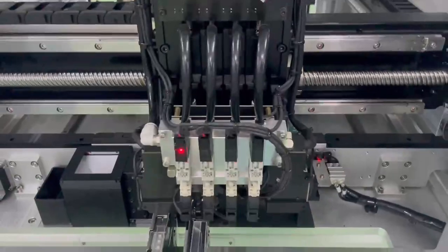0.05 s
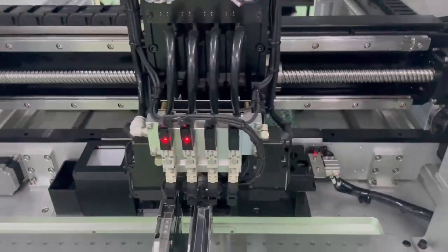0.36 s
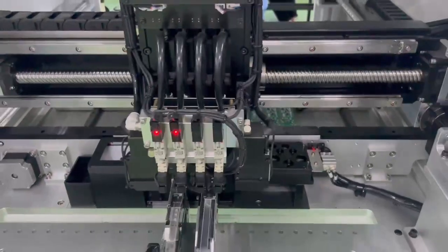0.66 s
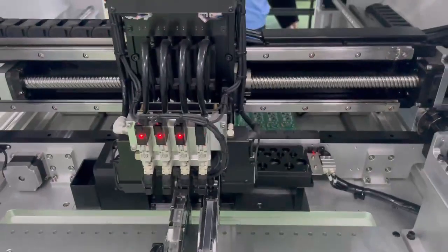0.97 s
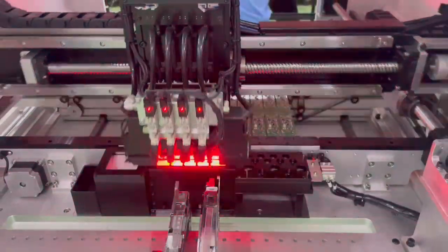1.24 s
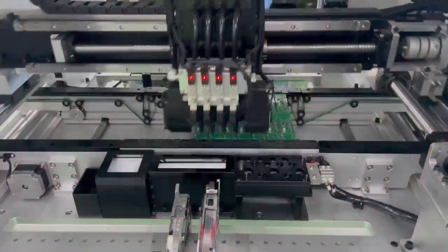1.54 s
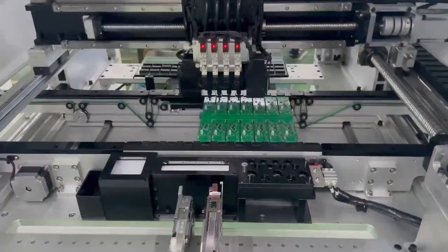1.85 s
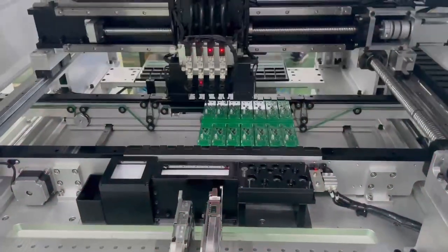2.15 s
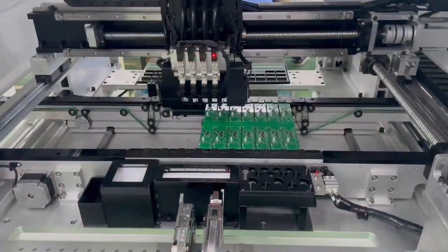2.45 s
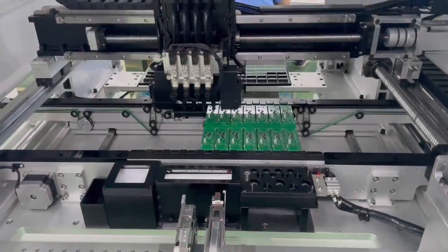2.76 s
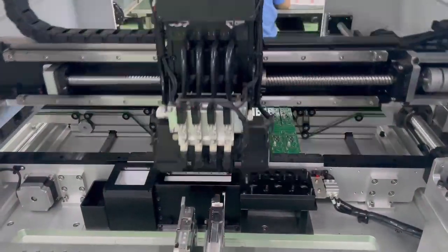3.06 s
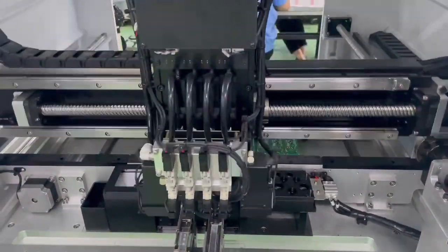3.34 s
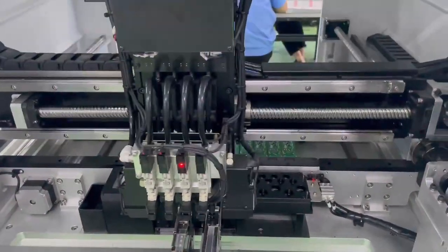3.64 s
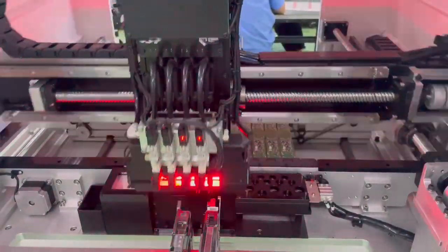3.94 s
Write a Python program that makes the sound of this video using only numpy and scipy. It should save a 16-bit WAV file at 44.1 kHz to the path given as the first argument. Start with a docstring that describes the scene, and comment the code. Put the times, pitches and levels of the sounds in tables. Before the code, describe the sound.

A pick-and-place machine clicks, hisses and whirs over a low factory rumble.

```python
"""Pick-and-place machine in a factory hall.

Nozzles jolt down to rattling feeders with a hiss and a stepper whistle; valves snap; a steel part
clanks once. The gantry rolls to the circuit board on ball screws, sets four parts down with small
puffs and rolls back. Underneath, the frame rumbles, fans blow and the motor drives whine faintly."""
import sys
import numpy as np
from scipy import signal
from scipy.fft import rfft, irfft
from scipy.io import wavfile
from scipy.ndimage import uniform_filter1d

SR = 44100
rng = np.random.default_rng(int(sys.argv[2]) if len(sys.argv) > 2 else 0)


def generate_wav(sig):
    """Save sig (samples, or channels by samples) to the path in sys.argv[1] as 16-bit PCM at SR."""
    pcm = np.round(np.clip(np.atleast_2d(sig).T, -1, 1) * 32767).astype(np.int16)
    wavfile.write(sys.argv[1], SR, pcm)


N = 176400
T = np.arange(N) / SR
FREQS = np.fft.rfftfreq(N, 1 / SR)
SIDES = np.array([[1], [-1]])  # left, right

# nozzle strokes (time [s], jolt [dB], thump [dB], hiss [dB], whistle [dB])
STROKES = [(0.069, -24, -20.5, -37, -40), (0.417, -22.5, -20.5, -37, -52), (0.766, -23, -19.5, -39, -48),
           (1.113, -23.5, -26, -37, -46), (3.491, -23, -24, -41, -49), (3.838, -24.5, -20, -38.5, -57)]
# head jolt and nozzle slide spectra (frequency [Hz], level [dB])
JOLT_SPECTRUM = [(500, -18), (2500, -2), (4400, 3), (5800, -11), (9000, 23), (11500, 3.5), (13500, 10),
                 (14800, 6), (16000, -14)]
HISS_SPECTRUM = [(800, 9.5), (2500, 6.5), (4500, 4.5), (6500, 5), (9000, 4.5), (12500, 5.5), (14500, 3),
                 (16000, -15)]
# head thump and clink modes (frequency [Hz], level [dB], T60 [s])
HEAD_MODES = [(139.4, -12.5, 0.36), (231, -13, 0.055), (278, -6.5, 0.06), (403, -12, 0.056)]
CLINK_MODES = [(4070, -6, .015), (4500, 6.5, 0.013), (4920, -5, 0.013), (13400, 5, .015)]
# gantry moves (start [s], length [s], ramp [s], rolling [dB], top speed [0-1], swish [dB])
MOVES = [(1.119, 0.22, 0.054, -34.5, 0.64, -42.5), (1.408, .42, 0.082, -33.5, 1, -38.5),
         (2.741, .54, 0.075, -34.5, 1, -39), (3.841, 0.49, 0.067, -33.5, 0.7, -39.5)]
# bearing ball and rail spectra (frequency [Hz], level [dB])
ROLLING_SPECTRUM = [(120, -36), (210, -2.5), (400, -6), (640, -6.5), (850, -8), (1500, -7.5), (2500, -15),
                    (4000, -17.5), (6000, -23.5), (14000, -30.5)]
SWISH_SPECTRUM = [(1500, -3), (3000, 10), (6000, -1.5), (10500, 7), (14000, -3), (16000, -62)]
# ball nut and beam modes (frequency [Hz], level [dB], T60 [s])
NUT_MODES = [(634, -0.5, 0.057), (1034, -3, 0.042), (1245, -2.5, 0.035), (1567, -4, .04), (1910, -4, .05),
             (2284, -6, .06), (2610, -3.5, .04), (2880, -8, 0.047), (3856, -13, 0.057), (4180, -9, 0.05)]
BEAM_MODES = [(204, -9, 0.15), (340, -6.5, 0.036), (477, -8.5, 0.073), (632, -5.5, 0.088),
              (694, -5.5, 0.068), (822, -10.5, 0.043), (1030, -5, 0.047), (1570, -16, 0.037)]
# beam swells in mid-travel and under braking (peak time [s], half length [s], level [dB])
BEAM_SWELLS = [(1.295, 0.075, -39.5), (1.598, 0.15, -29), (1.743, .09, -37), (2.99, .12, -29.5),
               (3.25, .09, -37.5)]
# valve and end-stop ticks (time [s], knock [dB], knock decay [s], air snap [dB])
TICKS = [(.178, -40, .01, -50), (0.202, -29.5, 0.015, -46), (0.552, -28.5, 0.015, -42),
         (0.6745, -31, 0.005, -27.5), (.864, -34, 0.0066, -26), (.9, -31, 0.018, -43),
         (1.022, -31, 0.0026, -41), (1.2205, -38, .004, -29), (3.276, -26.5, 0.0039, -32),
         (3.281, -25, 0.0026, -30), (3.4, -33, 0.0052, -30.5), (3.599, -42, .003, -34),
         (3.623, -28, 0.013, -28), (3.722, -41, .005, -40), (3.748, -35.5, .006, -42),
         (3.817, -39, .004, -43)]
# knock and air snap spectra (frequency [Hz], level [dB])
KNOCK_SPECTRUM = [(600, 9), (2500, -0.5), (4300, 9.5), (6000, 2.5), (9000, 16), (13000, -7), (16000, -11.5)]
SNAP_SPECTRUM = [(3000, -22), (7000, -9), (9000, 7), (11000, -3), (14000, 4), (16000, -10)]
# blows of the steel feeder part (time [s], level [dB])
STEEL_BLOWS = [(.326, -32), (0.3322, -26), (.342, -29), (.352, -27.5), (0.377, -36), (.4, -35)]
# steel impact spectrum (frequency [Hz], level [dB])
CRACK_SPECTRUM = [(400, 6.5), (1300, 6.5), (2200, 5), (4000, 3), (7000, 2), (9500, 6), (13000, -6),
                  (16000, -14)]
# steel part modes (frequency [Hz], level [dB], T60 [s])
STEEL_MODES = [(2706, -27.5, .42), (2685, -44, 1.9), (3262, -43, .3), (4081, -41, .24), (4400, -38, .12),
               (5038, -24, .15), (5045, -40, .85), (4937, -37, .42), (5860, -41, .6), (6770, -35, .16)]
# parts set on the board (time [s], puff [dB], slide [dB])
PLACINGS = [(1.925, -39, -40), (2.179, -34.5, -39.5), (2.416, -36.5, -40), (2.655, -38.5, -40)]
# air puff and brake rasp spectrum (frequency [Hz], level [dB])
PUFF_SPECTRUM = [(800, -20), (1600, -14), (2100, 6.5), (3000, -1.5), (4500, -33), (12000, -20)]
# feeder cover rattles (start [s], length [s], level [dB])
RATTLES = [(-.05, 1.19, -43), (3.3, 0.59, -48.5)]
# cover modes (frequency [Hz], level [dB], T60 [s])
COVER_MODES = [(884, -3, .04), (1234, -1, 0.049), (1600, -3.5, 0.042), (2150, -5.5, 0.026), (2630, -8, .02),
               (4470, -7, 0.016), (5210, -12, .025), (6480, -7, .012)]
# frame shudders (time [s], level [dB], frequency [Hz])
SHUDDERS = [(.065, -20, 91), (.21, -19, 128.3), (1.89, -20.5, 95), (1.97, -21.5, 85.45), (2.14, -27, 74.9),
            (2.201, -20, 120.1), (2.669, -24, 139), (2.721, -16, 120), (3.22, -25.5, 80.8)]
# frame and fan spectra, drive tones (frequency [Hz], level [dB])
RUMBLE_SPECTRUM = [(22, -55), (31, -22), (39, -5), (52, -3), (62, -1.5), (80, 1.5), (100, -3), (122, -1),
                   (165, -7.5), (240, -9.5), (280, -12.5), (360, -21.5), (600, -39), (1500, -53)]
FAN_SPECTRUM = [(150, -8.5), (350, 5.5), (560, 2), (1000, -2.5), (1600, -10), (2700, -14.5), (4500, -18),
                (6500, -23.5), (10500, -33), (14000, -23), (16000, -44)]
DRIVE_TONES = [(82, -35.5), (119, -39.5), (278, -43), (10665, -68)]
# sound reflected by the housing panels (frequency [Hz], power share [0-1])
PANEL_SHARE = [(900, 0.0081), (2000, 0.39), (5000, 0.98)]
# left-right likeness (frequency [Hz], correlation [0-1])
CORRELATION = [(60, 0.96), (130, 0.93), (250, 0.9), (500, 0.29), (1000, 0.18), (2500, 0.42), (5000, 0.18),
               (6800, .85), (7900, 1), (12000, 1)]
# stereo balance (frequency [Hz], left minus right [dB])
BALANCE = [(60, -2.5), (110, -3), (380, -4.5), (700, -3.5), (1290, 0), (2400, -1), (4400, 0.5), (8000, 0)]
# left channel treble lag (frequency [Hz], lag [rad])
LEFT_LAG = [(4500, 0), (6500, .7), (7300, 1.7), (7900, 3.05), (9500, 3.2), (10300, 4.6), (12000, 2 * np.pi)]


def nozzles():
    """Each stroke jolts the head, then slides with a hiss while its stepper whistles."""
    clink = unit(through(spread(white()), ring(CLINK_MODES)))
    jolt = noise(JOLT_SPECTRUM) + undb(-9.5) * clink
    hiss = enclosed_noise(HISS_SPECTRUM)
    stepper_hz = 6050 * (1 + 0.0013 * walk(198.6))
    whistle = tone(stepper_hz) + undb(-7) * tone(2 * stepper_hz)
    thump = unit(through(spread(white()), ring(HEAD_MODES)))
    out = 0
    for s, jolt_db, thump_db, hiss_db, whistle_db in STROKES:
        out += undb(jolt_db) * jolt * burst(s, rise_s=0.0092, decay_s=0.02)
        out += undb(thump_db) * thump * burst(s, rise_s=0.0092, decay_s=0.013)
        out += undb(hiss_db) * hiss * gate(s, length_s=0.18, rise_s=0.012, fall_s=0.075)
        out += undb(whistle_db) * whistle * gate(s + 0.017, length_s=0.11, rise_s=0.012, fall_s=0.012)
    return out


def gantry():
    """Balls patter in the screws, ringing nuts and beam; rails swish; the whine follows the speed."""
    speed = roll_gain = swish_gain = beam_gain = 0
    for s, length_s, ramp_s, roll_db, top_speed, swish_db in MOVES:
        moving = gate(s, length_s, ramp_s, ramp_s)
        speed += top_speed * moving
        roll_gain += undb(roll_db) * moving
        swish_gain += undb(swish_db) * moving
    for s, half_s, db in BEAM_SWELLS:
        beam_gain += undb(db) * np.cos(np.pi / 2 * np.clip((T - s) / half_s, -1, 1)) ** 2
    hits_per_s = 2500 * (1 + speed)
    balls = enclosed(white() * (rng.random((2, N)) < hits_per_s / SR))
    screw_hz = 661 * speed * (1 + 0.0315 * walk(150))
    whine = undb(-11) * tone(screw_hz)
    rolling = colour(balls, ROLLING_SPECTRUM) * (1 + 0.18 * walk(170))
    nuts = sum(through(balls, ring([mode])) * undb(3.5 * walk(25.1)) for mode in NUT_MODES)
    beam = beam_gain * unit(through(balls, ring(BEAM_MODES)))
    # the beam rasps as it stops at the feeders
    brake = undb(-32) * noise(PUFF_SPECTRUM) * burst(3.222, rise_s=0.0056, decay_s=0.012)
    nuts = drift(undb(-7.5) * unit(nuts), depth=0.018, rate_hz=14)  # resonances shift in travel
    swish = swish_gain * enclosed_noise(SWISH_SPECTRUM)
    return roll_gain * (rolling + nuts + whine) + beam + swish + brake


def valves(rise_s=0.00036):
    """Valves and end stops tick: a small knock and a sharp snap of air."""
    knocks = sum(undb(db) * burst(s - rise_s / 2, rise_s, decay_s) for s, db, decay_s, _ in TICKS)
    snaps = sum(undb(db) * burst(s, rise_s, decay_s=0.0035) for s, _, _, db in TICKS)
    return noise(KNOCK_SPECTRUM) * knocks + noise(SNAP_SPECTRUM) * snaps


def feeder_clank(pan_db=1):
    """Steel strikes steel in a quick run of blows and rings on roughly."""
    blows = sum(undb(db) * burst(s, rise_s=0.0022, decay_s=0.014) for s, db in STEEL_BLOWS)
    cracks = noise(CRACK_SPECTRUM) * blows
    ringing = np.array([sum(steel_partial(*mode) for mode in STEEL_MODES) for _ in range(2)])
    return (cracks + spread(ringing)) * undb(SIDES * pan_db / 2)


def steel_partial(hz, db, t60_s, flutter_db=3.2):
    """One fading partial of the loose steel part, wandering in pitch and level."""
    pitch_hz = hz * (1 + 0.011 * walk(160))
    envelope = burst(0.3315, rise_s=0.0048, decay_s=t60_s / np.log(1000))
    return undb(db + flutter_db * walk(160)) * tone(pitch_hz) * envelope


def placing(slide_s=0.073):
    """Over the board, air hisses and drives whine; each part drops with a puff and a nozzle slide."""
    puffs = sum(undb(db) * burst(s, rise_s=0.0045, decay_s=0.012) for s, db, _ in PLACINGS)
    slides = sum(undb(db) * gate(s - 0.01, slide_s, slide_s / 2, slide_s / 2) for s, _, db in PLACINGS)
    air = undb(-56.5) * noise([(4000, -27), (9000, -10), (13500, 10), (16000, -2)])
    swell_db = 6 * np.exp(-((T - 2.2) / 0.2) ** 2)
    whine = undb(-58.5 + swell_db) * tone(hz=13720 * (1 + 0.004 * walk(300)))
    over_board = gate(1.77, length_s=1.1, rise_s=0.08, fall_s=0.073)
    return puffs * noise(PUFF_SPECTRUM) + slides * noise(HISS_SPECTRUM) + (whine + air) * over_board


def cover_rattle(taps_per_s=150, scatter_db=4.5):
    """Loose feeder covers chatter lightly during the pickups."""
    taps = (rng.random((2, N)) < taps_per_s / SR) * undb(scatter_db * white())
    covers = unit(through(enclosed(taps), ring(COVER_MODES)))
    return covers * sum(undb(db) * gate(s, length_s, 0.05, 0.11) for s, length_s, db in RATTLES)


def small_motor():
    """A small motor hums briefly during a pickup."""
    hum = undb(-43) * tone(hz=865 * (1 + 0.0099 * walk(58.6)))
    return hum * gate(0.84, length_s=0.17, rise_s=0.032, fall_s=0.044)


def frame():
    """The frame rumbles and shudders under steady fans and wavering drive tones."""
    shudders = 0
    for s, db, hz in SHUDDERS:
        envelope = burst(s, rise_s=0.015, decay_s=0.0314)
        shudders += undb(db) * envelope * tone(hz * (1 + 0.0409 * walk(60)))
    drives = sum(undb(db + 4 * walk(12)) * tone(hz + 3 * walk(15)) for hz, db in DRIVE_TONES)
    rumble = undb(-25.5) * noise(RUMBLE_SPECTRUM)
    fans = undb(-35.5 - 0.03 * walk(20)) * noise(FAN_SPECTRUM)
    return rumble + fans + shudders + drives


def enclosed(pair, t60_s=0.073):
    """Close reflections between the housing panels ripple the treble."""
    echoes = rng.standard_normal(SR // 4) * np.exp(-np.log(1000) * T[:SR // 4] / t60_s)
    share = np.clip(curve(PANEL_SHARE), 0, 1)
    direct = np.sqrt(1 - share) * rfft(unit(pair))
    reflected = np.sqrt(share) * rfft(unit(through(pair, echoes)))
    return spread(irfft(direct + reflected, N))


def hall(x, t60_s=0.61):
    """Diffuse reverberation of the hall."""
    envelope = burst(0.0029, rise_s=0.0033, decay_s=t60_s / np.log(1000))
    tail = (spread(white()) * envelope)[:, :SR]
    return through(x, tail / np.sqrt(np.sum(tail ** 2) / 2))


def undb(db):
    """Decibels to gain."""
    return 10 ** (np.asarray(db) / 20)


def unit(x):
    """Scale to rms 1."""
    return x / np.sqrt(np.mean(x ** 2))


def curve(points):
    """Interpolate (Hz, value) points over log frequency."""
    hz, value = np.array(points).T
    return np.interp(np.log(FREQS + 1), np.log(hz), value)


def walk(rate_hz):
    """Smooth random wander, rms 1."""
    hold = int(SR / rate_hz)
    steps = np.repeat(rng.standard_normal(N // hold + 2), hold)
    return unit(uniform_filter1d(uniform_filter1d(steps, hold), hold)[:N])


def drift(pair, depth, rate_hz):
    """Pitch wander by the rms fraction depth."""
    clock_s = np.cumsum(1 + depth * walk(rate_hz)) / SR
    return np.array([np.interp(clock_s % T[-1], T, channel) for channel in pair])


def spread(pair):
    """Two unrelated signals to stereo, alike in the bass and top treble."""
    likeness = np.clip(curve(CORRELATION), -1, 1)
    mid, side = rfft(pair)
    return irfft(mid * np.sqrt((1 + likeness) / 2) + SIDES * side * np.sqrt((1 - likeness) / 2), N)


def colour(x, spectrum):
    """Filter by a spectrum, rms 1."""
    return unit(irfft(rfft(x) * undb(curve(spectrum)), N))


def white():
    """Two unrelated white noises."""
    return rng.standard_normal((2, N))


def noise(spectrum):
    """Coloured stereo noise."""
    return colour(spread(white()), spectrum)


def enclosed_noise(spectrum):
    """Coloured stereo noise inside the housing."""
    return colour(enclosed(white()), spectrum)


def burst(start_s, rise_s, decay_s):
    """Smooth rise, exponential decay."""
    attack = np.sin(np.pi / 2 * np.clip((T - start_s) / rise_s, 0, 1)) ** 2
    return attack * np.exp(-np.maximum(T - start_s - rise_s, 0) / decay_s)


def gate(start_s, length_s, rise_s, fall_s):
    """Trapezoid envelope."""
    return np.clip(np.minimum((T - start_s) / rise_s, (start_s + length_s - T) / fall_s), 0, 1)


def ring(modes):
    """Impulse response of a struck body, 1 s."""
    t = T[:SR]
    return sum(undb(db) * np.sin(2 * np.pi * hz * t) * np.exp(-np.log(1000) * t / t60_s)
               for hz, db, t60_s in modes)


def through(x, response):
    """Convolve with an impulse response."""
    return signal.fftconvolve(np.atleast_2d(x), np.atleast_2d(response), axes=1)[:, :N]


def tone(hz):
    """Sine on a moving pitch, rms 1."""
    return np.sqrt(2) * np.sin(2 * np.pi * (np.cumsum(hz) / SR + rng.random()))


def scene():
    """Moving parts echo in the hall; the nearby valves and the frame stay dry."""
    work = nozzles() + feeder_clank() + cover_rattle() + gantry() + placing() + small_motor()
    return work + undb(-12) * hall(work) + valves() + frame()


def record(dry, cutoff_hz=16000):
    """Stereo image: more bass on the right, treble out of phase near 9 kHz; the top is cut."""
    balance = undb(SIDES * curve(BALANCE) / 2)
    left_lag = np.exp(-1j * np.array([[1], [0]]) * curve(LEFT_LAG))
    lowpass = signal.ellip(8, 0.2, 80, cutoff_hz, fs=SR, output="sos")
    return signal.sosfilt(lowpass, irfft(rfft(dry) * balance * left_lag, N))


dry = scene()
out = record(dry)
generate_wav(out)
```